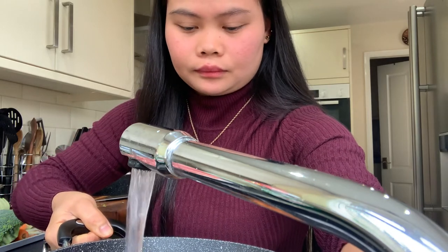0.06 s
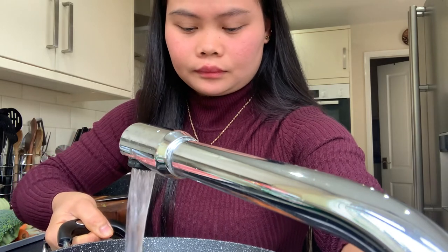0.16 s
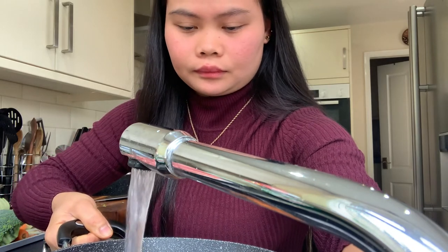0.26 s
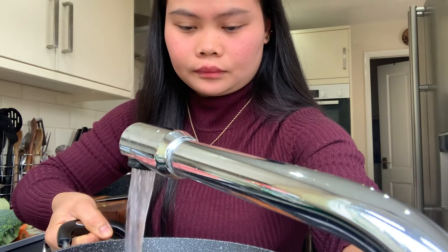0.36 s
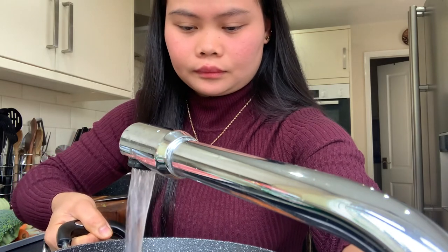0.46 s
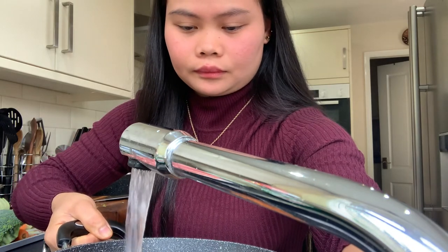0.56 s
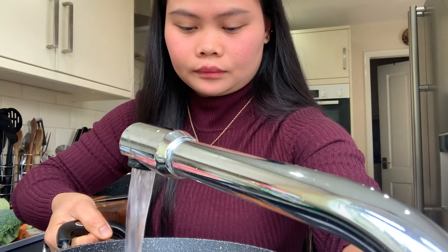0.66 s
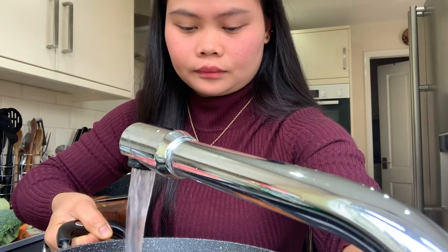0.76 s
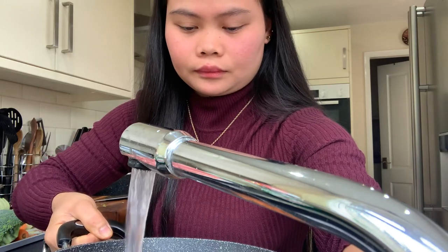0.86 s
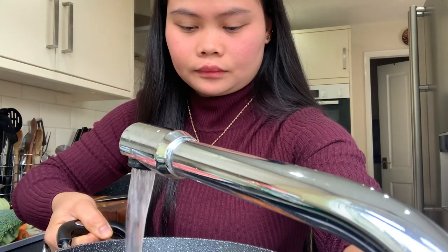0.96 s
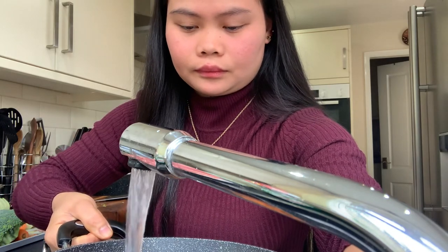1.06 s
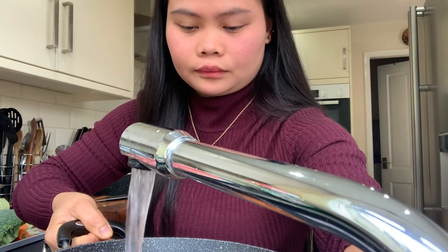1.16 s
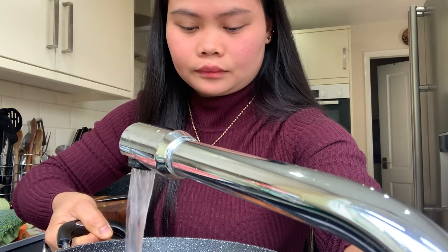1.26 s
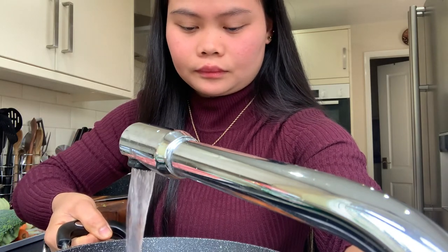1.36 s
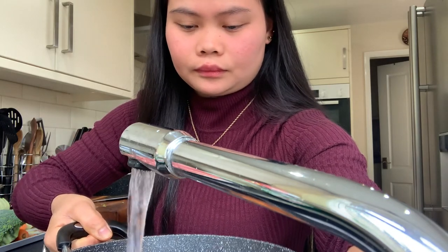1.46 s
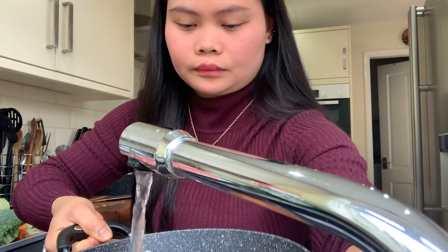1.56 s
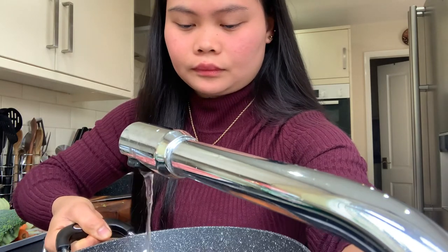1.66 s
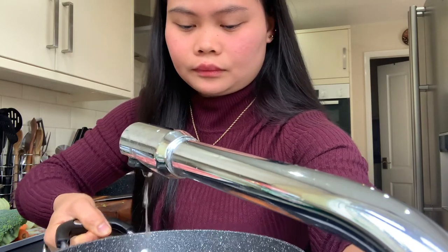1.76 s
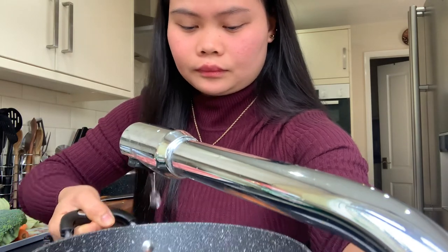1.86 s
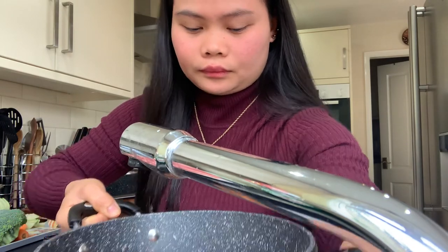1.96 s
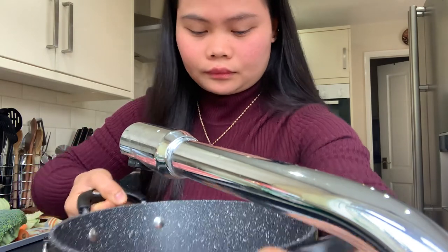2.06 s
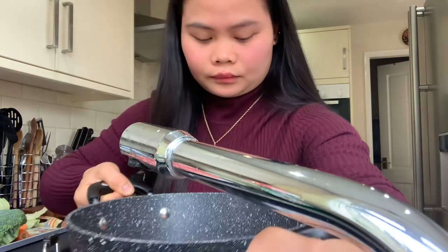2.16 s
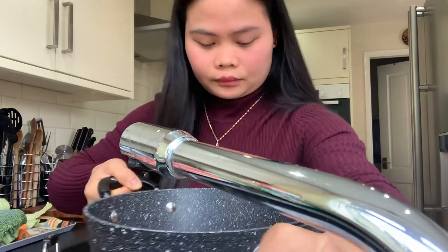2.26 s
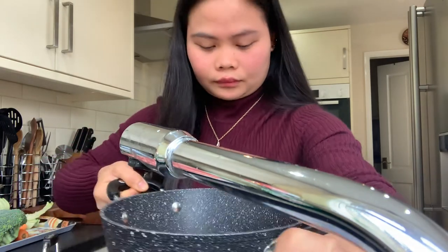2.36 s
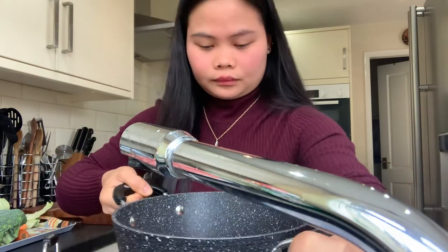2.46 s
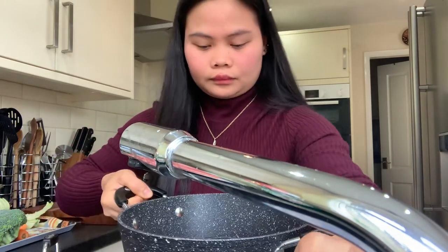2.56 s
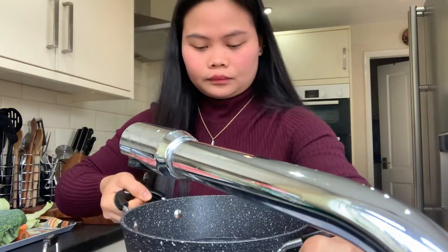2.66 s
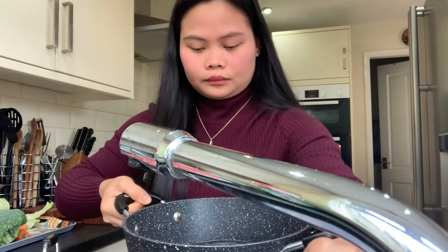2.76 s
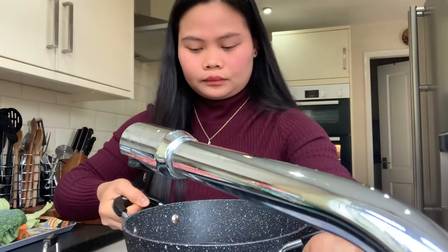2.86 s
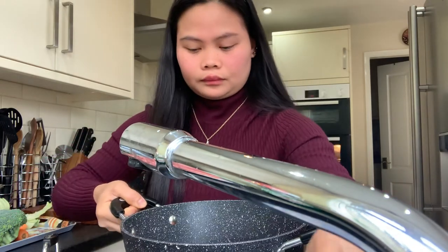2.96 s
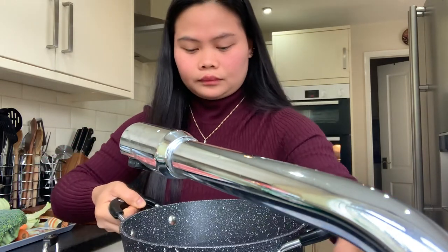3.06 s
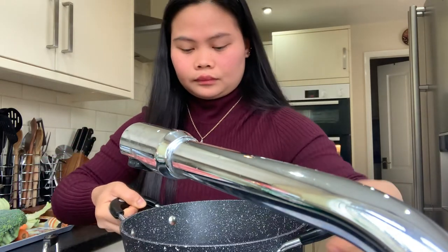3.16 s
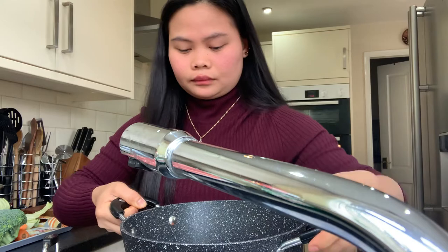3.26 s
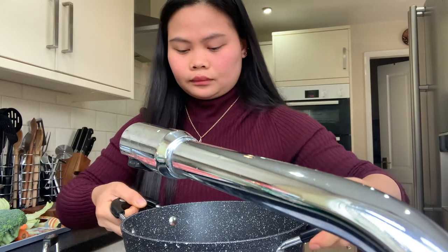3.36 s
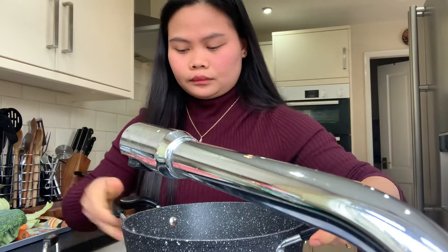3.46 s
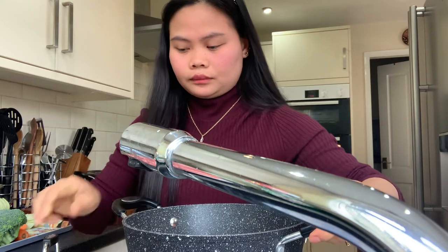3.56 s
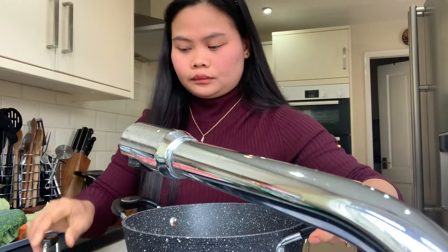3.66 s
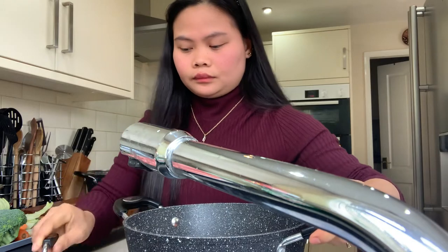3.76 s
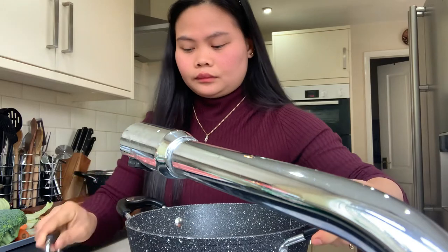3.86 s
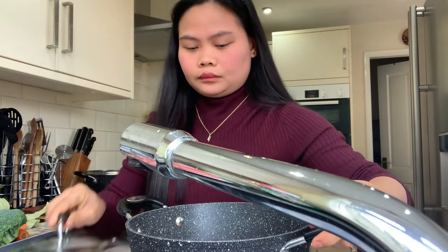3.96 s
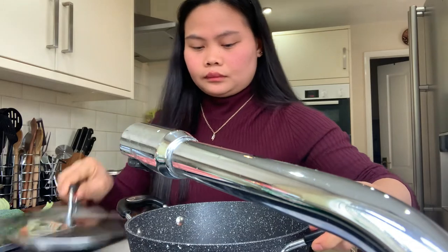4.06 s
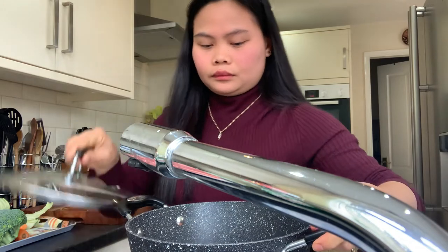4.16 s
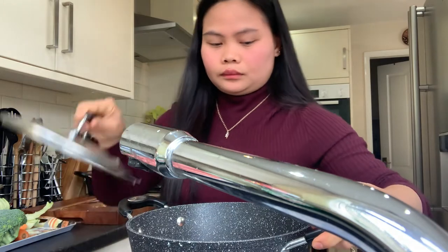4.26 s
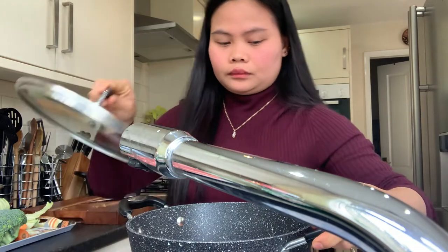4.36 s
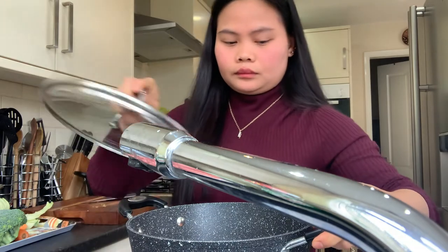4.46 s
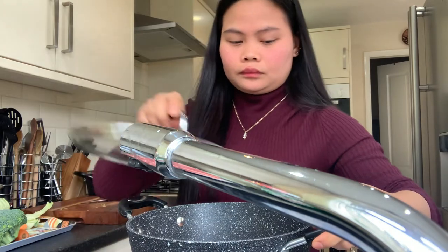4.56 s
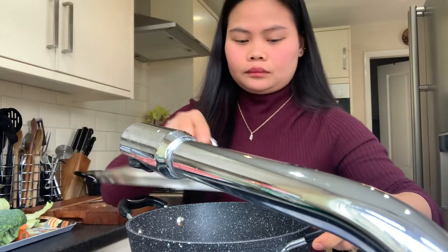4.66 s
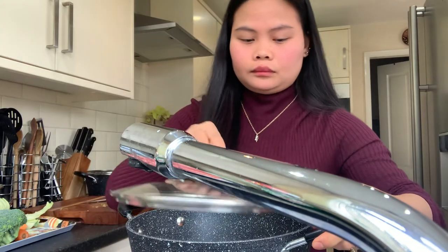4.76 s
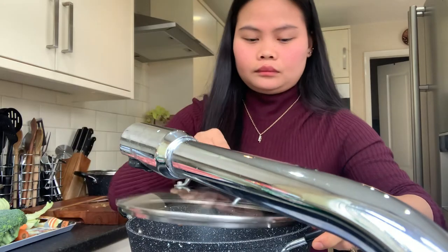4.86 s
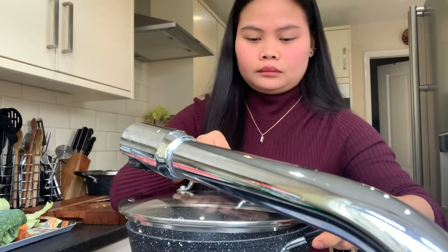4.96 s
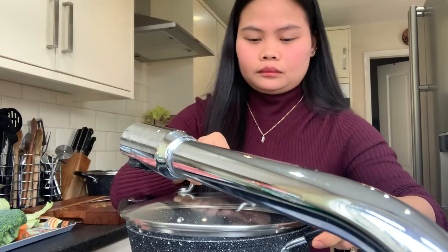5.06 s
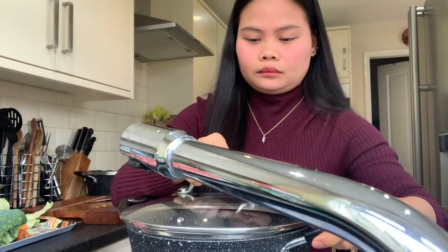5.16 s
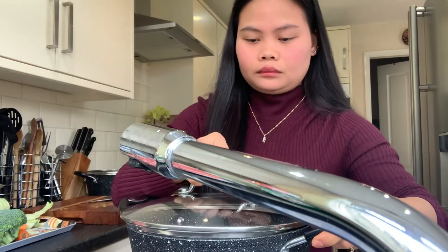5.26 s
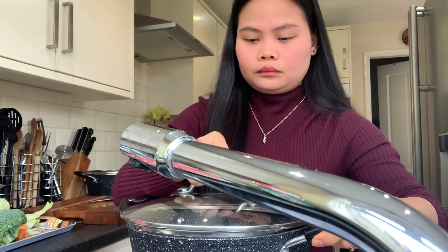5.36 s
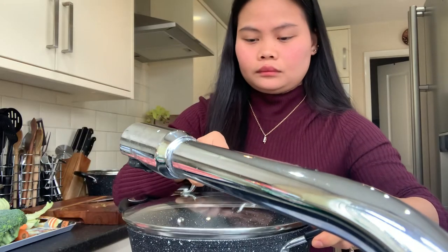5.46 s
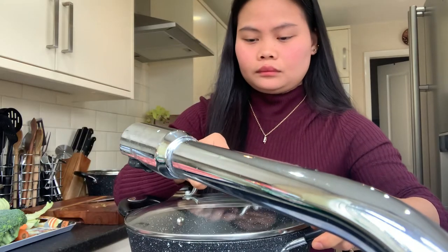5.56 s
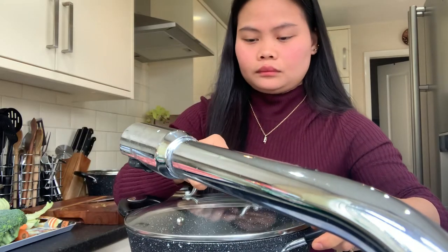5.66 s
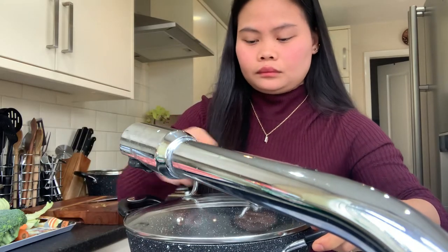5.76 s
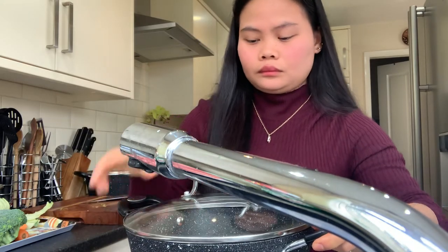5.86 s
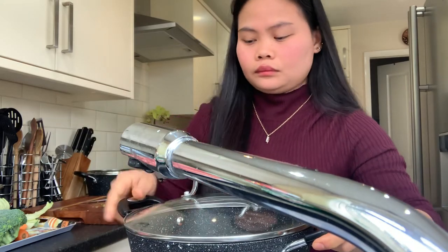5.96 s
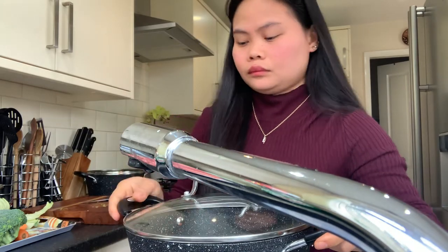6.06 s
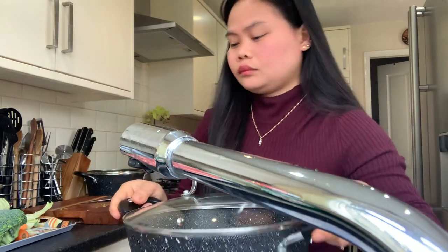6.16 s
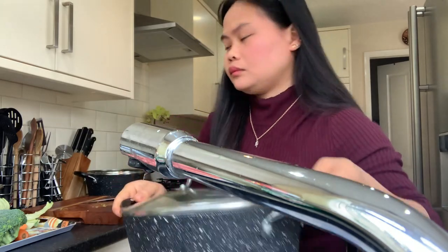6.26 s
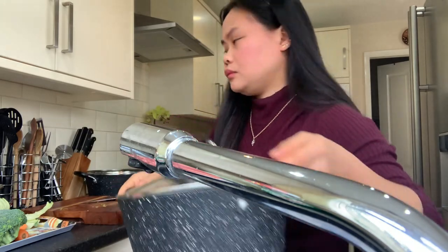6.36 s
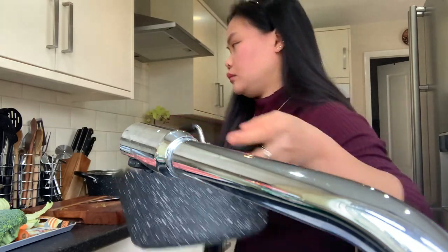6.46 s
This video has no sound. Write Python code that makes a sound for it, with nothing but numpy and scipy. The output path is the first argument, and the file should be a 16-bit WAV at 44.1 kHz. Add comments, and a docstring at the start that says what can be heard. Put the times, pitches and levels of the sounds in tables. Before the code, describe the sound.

A small, hard-surfaced kitchen heard in close stereo, with quiet low rumble and appliance hum throughout. From 0 to 1.5 s a tap runs strongly into a part-filled metal pot: dense splashing, fizzy spray, hollow gurgles and scattered deep plops, coloured by the pot. At about 1.5 s the flow collapses; a soft low rub of the lever, a dribble, plops and tiny bright droplets follow until 1.9 s, while foam crackle fades. A faint slosh comes at 2.1 s. The heavy pot thuds down at 2.8 s and again, duller, at 3.0 s. A light tick at 3.3 s and faint hand brushes precede a clattering lid clank at 3.9 s. The loudest, ringing clank comes at 4.15 s. The lid knocks the rim at 4.9 s, scrapes and rattles around 5.1 s, slides again at 5.4 s and seats with a firm clack at 5.6 s, then a faint low knock at 5.75 s; only hum remains.

```python
"""In a small hard kitchen, over a low hum, a tap runs into a metal pot and is shut off; drops plop, foam fizzes out.
The pot is set on the worktop; its steel-rimmed glass lid is tipped and lifted with clanks, slid and seated.
Water is a crowd of decaying bubble tones and noise grains, coloured by the resonances of the pot.
Each impact sums a click, a noise burst of dense modes and ringing tones; rubbing is random slips through
broad resonances. Two close microphone ports share every frequency between their mid and side."""
import sys
import numpy as np
from scipy import signal
from scipy.fft import rfft, irfft, next_fast_len
from scipy.io import wavfile
from scipy.ndimage import uniform_filter1d

SR = 44100
rng = np.random.default_rng(int(sys.argv[2]) if len(sys.argv) > 2 else 0)


def master(y):
    """Save y as 16-bit WAV."""
    cut = np.clip(np.atleast_2d(y).T, -1, 1)
    pcm = np.round(cut * 32767)  # scale
    wavfile.write(sys.argv[1], SR, pcm.astype(np.int16))


N = 287527

# reverberation of the kitchen: (frequency [Hz], time to fall 60 dB [s])
ROOM_T60 = [(60, 0.91), (300, 0.2), (1000, 0.48), (3000, 0.45), (6000, 0.41), (13000, 0.062)]
BANDS = 35 * 2 ** np.arange(0, 9, 1 / 3)  # third-octave centres [Hz]
TIME = np.arange(N) / SR  # [s]
RING = TIME[:int(.8 * SR)]  # time axis of one impact or room tail [s]
FREQ = np.fft.rfftfreq(next_fast_len(N + SR), 1 / SR)  # [Hz]
CLOSE_S, FOAM_END_S = 1.52, 2.7  # the tap is closed; the last of the foam is gone


def undb(db):
    """Decibels to amplitude ratio; twice the decibels give the power ratio."""
    return 10 ** (np.asarray(db) / 20)


def unit(x):
    """Normalise to rms 1, so that a later gain sets the level."""
    return x / np.sqrt(np.mean(x ** 2))


def at(table, hz):
    """Interpolate (frequency [Hz], value) points on a logarithmic frequency axis."""
    f, value = np.transpose(table)
    return np.interp(np.log(np.maximum(hz, 1)), np.log(f), value)


def colour(x, gain):
    """Linear filtering: the spectrum is multiplied by a gain given on FREQ."""
    size = next_fast_len(N + SR)
    return irfft(rfft(x, size) * gain, size)[..., :N]


def below(hz):
    """Low-pass gain on FREQ: third-order Butterworth magnitude without phase shift."""
    return 1 / np.sqrt(1 + (FREQ / hz) ** 6)


def above(hz):
    """High-pass gain on FREQ, power-complementary to the low-pass."""
    return np.sqrt(1 - below(hz) ** 2)


def fade(t, t60):
    """Exponential decay of a damped oscillator, 60 dB down after t60 [s]."""
    return np.exp(-np.log(1000) * t / t60)


def dies(start_s, db_per_s):
    """Exponential decay with a delayed onset: gain 1 until start_s, then a steady fall in decibels."""
    return undb(-db_per_s * np.maximum(TIME - start_s, 0))


def add(out, s, sound):
    """Superposition: mix a sound in at time s [s]."""
    start = max(int(s * SR), 0)
    out[..., start:start + sound.shape[-1]] += sound[..., :N - start]


def band_noise():
    """Third-octave analysis of white noise, uncorrelated in two channels: bands x 2 x N."""
    edges = np.array([2 ** (-1 / 6), 2 ** (1 / 6)])
    noises = []
    for hz in BANDS:
        sos = signal.butter(2, hz * edges, "band", fs=SR, output="sos")
        noises.append(unit(signal.sosfilt(sos, rng.standard_normal((2, N)))))
    return np.array(noises, np.float32)


def burst(bank, envelopes, band_db):
    """Frequency-dependent decay: random band noise, one envelope a band, band_db its relative energy per Hz."""
    start = rng.integers(N - len(RING))
    bands = bank[:, :, start:start + len(RING)] * envelopes[:, None].astype(np.float32)
    energy = np.einsum("bct,bct->bc", bands, bands)
    gain = undb(band_db)[:, None] * np.sqrt(BANDS[:, None] / energy)
    return np.einsum("bc,bct->ct", gain.astype(np.float32), bands)


def kitchen(bank, x, wet_db):
    """Direct sound a quarter turn apart at the two ports, plus diffuse reverberation from tiles and cupboards."""
    tail = burst(bank, fade(RING, at(ROOM_T60, BANDS)[:, None]), 0 * BANDS) / np.sqrt(BANDS.sum())
    direct = np.array([x, colour(x, 1j)])
    wet = undb(wet_db) * signal.fftconvolve(x[None], tail, axes=1)[:, :N]
    return (direct + wet) / np.sqrt(1 + undb(2 * wet_db))


def background(air_db=-52, hum_db=0, waver=0.93):
    """Room rumble is shaped broadband noise; an appliance's hum is tones with slow random phase modulation."""
    # spectrum of the room rumble: (frequency [Hz], relative level per Hz [dB])
    air_spectrum = [(21, -52), (35, -13), (102, -16), (124, -13), (207, -13.5), (234, -17), (310, -10.5),
                    (734, -25.5), (876, -20.5), (946, -22.5), (6330, -61.5), (9270, -56), (15000, -63.5)]
    # hum lines: (frequency [Hz], level [dB])
    hum_lines = [(99.5, -52.5), (203, -58.5), (309, -63), (899.0, -69.5)]
    air = unit(colour(rng.standard_normal((2, N)), undb(at(air_spectrum, FREQ))))
    hum = 0
    for hz, db in hum_lines:
        drift = unit(colour(rng.standard_normal(N), 1 / (1 + (FREQ / 5) ** 2)))
        hum = hum + undb(db + hum_db) * unit(np.sin(2 * np.pi * hz * TIME + waver * drift))
    return undb(air_db) * air + hum / np.sqrt(2)


def bubble(hz, t60, rise):
    """Bubble resonance: a damped sine whose pitch climbs by the share rise as it nears the surface."""
    t = TIME[:int(t60 * SR)]
    return np.sin(2 * np.pi * hz * t * (1 + rise * t / t60 / 2)) * fade(t, t60)


def grains(scatter_db):
    """Impulsive noise: each random sample has its own, very unequal strength."""
    return rng.standard_normal(N) * undb(scatter_db * np.minimum(rng.exponential(size=N), 5))


def bubble_crowd(count, scatter_db, cycles):
    """Incoherent sum of many bubble resonances over four octaves; the small ones are more even in strength."""
    bubbles = np.zeros(N)
    for when, place, size in rng.random((count, 3)):
        hz = 330 * 16 ** place
        loudness = undb(-scatter_db * (1 - place / 2) * np.log(size * .99 + .01))
        add(bubbles, when * FOAM_END_S, hz * loudness * bubble(hz, cycles / hz, 0.11))
    return bubbles


def pot_colour():
    """Source-filter principle: the water's spectrum times the resonances of the part-filled pot."""
    # spectrum of the running water: (frequency [Hz], relative gain [dB])
    water_spectrum = [(45, -1), (110, -3), (230, -5), (350, -9), (600, -9), (1100, -8), (1600, -12),
                      (2400, -13.5), (4200, -14.5), (6400, -8), (7600, -20), (9500, -3), (12000, -8.5),
                      (15000, -8)]
    # resonances and dips of the part-filled pot: (frequency [Hz], width [Hz], lift [dB])
    cavity = [(240, 70, -3), (465, 50, 6), (630, 70, 6.5), (1090, 100, 1.5), (1235, 70, 6), (1400, 120, -5),
              (1720, 70, 5), (1900, 120, -2), (2400, 200, 5), (2980, 60, 5), (4300, 300, -3),
              (5450, 700, -2.5), (6420, 300, 3), (6980, 160, 6), (7850, 300, 7), (8520, 220, 6),
              (10500, 300, 4), (13400, 300, 4)]
    gain_db = at(water_spectrum, FREQ)
    for hz, width, db in cavity:
        gain_db = gain_db + db / (1 + (2 * (FREQ - hz) / width) ** 2)
    return undb(gain_db)


def stream(bank, spray_db=-5, fizz_scatter_db=4.0):
    """Bubble entrainment: the jet drives in bubbles of all sizes; foam fizzes, then crackles over lapping water."""
    running = TIME < FOAM_END_S
    bubbles = bubble_crowd(count=2400, scatter_db=4.0, cycles=25)
    spray = grains(fizz_scatter_db) * running
    # the jet wobbles, so that its spray comes in spurts: 4 dB rms, up to about 22 Hz
    surge = undb(4 * unit(colour(rng.standard_normal(N), below(22))))
    gain = pot_colour()
    splash = colour(unit(bubbles) + 2 * undb(spray_db) * unit(spray * surge), gain * below(5050))
    foam = colour(spray, gain * above(5600))
    crackle = colour(grains(7.5) * running, gain * above(2600) * below(7100))  # bursting foam is uneven
    lapping = colour(splash, below(1450))

    closing = dies(CLOSE_S, 116)  # falls [dB/s]
    jet = undb(-37) * closing
    dribble = undb(-53) * dies(1.8, 116)
    fizz = undb(-40) * dies(CLOSE_S + 0.03, 234)
    # half strength under the jet, rising towards 1.5 as the splash ends, all under a slow fall
    settling = undb(-55) * dies(CLOSE_S, 27.5) * (1.5 - closing)
    layers = [(splash, np.maximum(jet, dribble)), (foam, fizz), (crackle, settling), (lapping, settling)]
    water = sum(sound * level / sound[running].std() for sound, level in layers)
    return kitchen(bank, water, wet_db=0.0)


def bubbling(start_s, end_s, count, db, scatter_db, low_hz, octaves, cycles):
    """Random entrainment: single bubbles at uniformly random moments, of random pitch and strength."""
    out = np.zeros(N)
    for when, place, size in rng.random((count, 3)):
        hz = low_hz * 2 ** (octaves * place)
        gain = undb(db + scatter_db * (2 * size - 1.5))
        add(out, start_s + when * (end_s - start_s), gain * bubble(hz, cycles / hz, 0.079))
    return out


def gurgle(bank):
    """Big air pockets dragged down by the jet ring low, its spatter higher; the thin dribble traps a few more."""
    jet = bubbling(0, CLOSE_S, count=90, db=-31.5, scatter_db=3.0, low_hz=480, octaves=1.42, cycles=22)
    spatter = bubbling(0, CLOSE_S, count=45, db=-36, scatter_db=4, low_hz=1600, octaves=1.05, cycles=24)
    dribble = bubbling(1.66, 1.85, count=16, db=-42, scatter_db=3, low_hz=440, octaves=1.6, cycles=19)
    return kitchen(bank, jet + spatter + dribble, wet_db=-2)


def plops(bank, splat_db=-11, splat_s=0.076, splat_hz=3000, count=6, small_db=-8, small_cycles=20,
          small_hz=560, octaves=1.34, within_s=0.011, rise=0.12):
    """Drop impact: a noisy splat, then the resonance of one big trapped bubble and a few small ones."""
    # large drops and air pockets: (time [s], bubble pitch [Hz], level [dB], decay time to -60 dB [s])
    drops = [(.039, 1144, -28, 0.083), (.198, 670, -31, 0.071), (.29, 1160, -24.5, 0.025),
             (.395, 1180, -37, 0.051), (.575, 625, -29, 0.073), (.577, 460, -24.5, 0.083),
             (.673, 1054, -30, 0.073), (.788, 460, -31, 0.08), (1.461, 1050, -34, 0.05),
             (1.688, 2050, -39, 0.053), (1.692, 640, -31, 0.043), (1.735, 656, -29, 0.029),
             (1.776, 1178, -23, 0.052), (1.778, 800, -32, 0.015), (1.804, 1207, -36.5, 0.12),
             (1.852, 578, -27.5, 0.064)]
    tones, splats = np.zeros((2, N))
    for s, hz, db, ring_s in drops:
        add(tones, s, undb(db) * bubble(hz, ring_s, rise))
        for when, place in rng.random((count, 2)):
            pitch = small_hz * 2 ** (octaves * place)
            gain = undb(db + small_db) * np.sqrt(small_hz / pitch)
            add(tones, s + within_s * when, gain * bubble(pitch, small_cycles / pitch, rise))
        add(splats, s, undb(db + splat_db) * rng.standard_normal(len(RING)) * fade(RING, splat_s))
    return kitchen(bank, tones + colour(splats, 1 / (1 + (FREQ / splat_hz) ** 2)), wet_db=-9.5)


def slip(length, hz, width):
    """Stick-slip friction: irregular impulses drive one broad resonance, filtered twice; rms 1."""
    size = int(length * SR)
    slips = rng.standard_normal(size) * (rng.random(size) < .03)
    resonance = signal.iirpeak(hz, hz / width, fs=SR)
    sound = signal.lfilter(*resonance, signal.lfilter(*resonance, slips))
    return unit(sound * signal.windows.tukey(size, .25))


def rubs(bank):
    """Friction noise: brushes of the hand, a slosh of water and slides of the rim, all as random slips."""
    # the lid's rim slides on the pot: (time [s], length [s], level [dB])
    slides = [(5.071, 0.12, -34.5), (5.433, 0.061, -36.5)]
    # resonances that a slide rings: (frequency [Hz], filter width [Hz], level [dB])
    rim = [(292, 205, 0.5), (605, 250, -12.5), (1540, 46, -28), (2220, 180, -35), (2820, 2000, -27.5)]
    # the tap's lever is pushed shut, the water sloshes as the pot is lifted, a hand brushes the handle,
    # then drags the lid: (time [s], length [s], level [dB], centre [Hz], filter width [Hz])
    brushes = [(1.604, 0.23, -45, 62.3, 112), (2.069, 0.068, -61.5, 1190, 500),
               (3.375, 0.079, -69, 4150, 6000), (3.762, 0.27, -55.5, 810, 1610)]
    out = np.zeros(N)
    for s, length, db in slides:
        add(out, s, sum(undb(db + rim_db) * slip(length, hz, width) for hz, width, rim_db in rim))
    for s, length, db, hz, width in brushes:
        add(out, s, undb(db) * slip(length, hz, width))
    return kitchen(bank, out, wet_db=6.0)


def droplets(bank, cycles=110, tick_db=-7, tick_s=0.022):
    """Small-bubble resonance: a fine droplet ticks on the surface and leaves one tiny, bright bubble."""
    # droplets flung off as the stream breaks up: (time [s], bubble pitch [Hz], level [dB])
    fine_drops = [(1.667, 4860, -44), (1.669, 6440, -45), (1.741, 6340, -43), (1.769, 6150, -37),
                  (1.776, 4950, -41), (1.816, 4150, -41.5), (1.819, 6400, -43), (1.842, 6300, -41),
                  (1.852, 1890, -50), (1.932, 6630, -49)]
    out = np.zeros(N)
    for s, hz, db in fine_drops:
        add(out, s, undb(db) * bubble(hz, cycles / hz, 0.12))
        add(out, s, undb(db + tick_db) * rng.standard_normal(len(RING)) * fade(RING, tick_s))
    return kitchen(bank, colour(out, below(10000)), wet_db=-8)


def rebounds(knocks, count, shrink, loss_db, bass_step_db, treble_step_db):
    """Inelastic rebound: each knock is count contacts, every one weaker and retuned in bass and treble."""
    blows = []
    for s, db, bass_db, treble_db, spot_hz, gap in knocks:
        for k in range(count):
            bass = bass_db + k * bass_step_db
            treble = treble_db + k * treble_step_db
            blows.append((s, db - k * loss_db, bass, treble, spot_hz))
            s = s + gap * shrink ** k
    return blows


def wander(count, hz):
    """Multipath interference: slow random complex gain, one row a tone, as many reflections give it."""
    low_pass = signal.butter(2, hz, fs=SR, output="sos")
    walks = signal.sosfilt(low_pass, rng.standard_normal((2, count, 2 * len(RING))))
    return unit(walks[0, :, len(RING):]) + 1j * unit(walks[1, :, len(RING):])


def ringing(modes, ring_s, echo_db, lag_cycles, bright_db, spread_hz=28, linger_s=0.48, dull_hz=9500):
    """Modal decay: each mode has a share of unit energy, dies in the hand and lingers, wavering, in the room."""
    # modes that hand and rim hardly damp, so that they ring on: (frequency [Hz], decay time to -60 dB [s])
    free_modes = [(413, .3), (444, .26), (995, .42), (1605, .24), (1836, .18), (2088, .38), (2288, .2),
                  (2470, .38), (2530, .33), (2499, .35), (2606, .26), (3114, .4), (3408, .33), (4285, .3),
                  (5455, .19), (11190, .18), (12660, .18), (14250, .17)]
    hz, mode_db = np.transpose(modes)[:, :, None]
    mode_db = mode_db + bright_db * np.log2(hz / 1000)
    room_t60 = linger_s / (1 + (hz / dull_hz) ** 2)
    own_t60 = ring_s * (1000 / hz) ** 0.11
    for free_hz, free_s in free_modes:
        own_t60[hz == free_hz] = free_s
    envelope = fade(RING, own_t60) + undb(echo_db) * wander(len(hz), spread_hz) * fade(RING, room_t60)
    onset = 1 - np.exp(-RING * hz / lag_cycles)
    envelope = envelope * onset * (1 - (RING / RING[-1]) ** 2)  # reaches zero at the end of RING
    energy = np.sum(np.abs(envelope) ** 2, axis=1, keepdims=True) / 2
    share = undb(mode_db) / np.sqrt(energy * np.sum(undb(2 * mode_db)))
    return np.exp(2j * np.pi * hz * RING) * envelope * share


def clusters(hz, lift_db, width_hz=40, width_share=0.0023):
    """Modal density: a gain on FREQ, positive lift_db gathering dense modes around the main ones."""
    grid = FREQ[::32]
    width = width_hz + width_share * hz[:, None]
    near = np.exp(-((grid - hz[:, None]) / width) ** 2).max(axis=0)
    power = undb(2 * lift_db * near)
    return np.interp(FREQ, grid, np.sqrt(power / uniform_filter1d(power, size=201)))


def contact(f, bass_db, treble_db, spot_hz):
    """Contact spectrum in dB: heavy blows add bass, hard ones treble; the spot struck lifts modes near its pitch."""
    spot = 6.5 * np.exp(-(np.log2(f / spot_hz) / 0.049) ** 2)  # lift [dB], 1/e half width [octaves]
    return spot + bass_db / (1 + (f / 300) ** 2) + treble_db / (1 + (2000 / f) ** 2)


def strike(bank, blows, body, modes, crack_db, damp_s, room_db, ring_s, echo_db, lag_cycles, bright_db,
           cluster_db, click_db):
    """Modal impact: a contact click, a crack of dense modes, ringing tones and room tail; bass builds up later."""
    build = 1 - np.exp(-RING * BANDS[:, None] / lag_cycles)
    crack = fade(RING, damp_s * (1000 / BANDS[:, None]) ** 0.031)
    room = undb(room_db) * fade(RING, at(ROOM_T60, BANDS)[:, None])
    envelopes = build * np.hypot(crack, room)
    body_db = at(body, BANDS)
    body_db = crack_db + body_db - 10 * np.log10(np.sum(BANDS * undb(body_db) ** 2))
    hz = np.transpose(modes)[0]
    tones = ringing(modes, ring_s, echo_db, lag_cycles, bright_db)
    span = np.sqrt(.035 * SR / (1 + undb(2 * crack_db)))  # reference energy: 35 ms, shared by ring and crack
    rings, cracks = np.zeros((2, 2, N))
    for s, db, bass_db, treble_db, spot_hz in blows:
        # every mode reaches the two ports up to a quarter turn apart, the low ones less
        apart = rng.choice([-1, 1], len(hz)) * hz / (hz + 200) / 4
        turn = rng.random(len(hz)) + np.array([[0], [1]]) * apart
        mode_gain = undb(contact(hz, bass_db, treble_db, spot_hz))
        ring = ((mode_gain * np.exp(2j * np.pi * turn)) @ tones).imag
        add(rings, s, undb(db) * span * ring)
        click = rng.standard_normal(len(RING)) * fade(RING, .006)  # hard edges meet
        add(rings, s, undb(db + treble_db + click_db) * click)
        crack_bands_db = body_db + contact(BANDS, bass_db, treble_db, spot_hz)
        add(cracks, s, undb(db) * span * burst(bank, envelopes, crack_bands_db))
    return rings + colour(cracks, clusters(hz, cluster_db))


def pot_down(bank):
    """Mode excitation by position: the full pot lands on one side of its base, then drops, duller, on the other."""
    # landings: (time [s], level [dB], extra bass [dB], extra treble [dB], favoured pitch [Hz],
    # time to the first rebound [s], side that lands)
    landings = [(2.8203, -20.5, -2.5, -2.5, 1510, .012, "first"),
                (2.885, -36.5, -11, -4, 1510, 0.014, "first"),
                (3.009, -26.5, 2.5, -1, 613, 0.012, "second"), (3.062, -43, -8, -22, 713, 0.017, "second")]
    # modes of the pot: (frequency [Hz], landing on the first side [dB], on the second [dB])
    pot_modes = [(55, -6, -10), (97, -6, -8), (145, -12, -2), (208, 2, -5), (270, -11, -11), (335, -8, -9),
                 (445, -22, -3), (590, -15, -7), (696, -6, -6), (768, -12, -5), (885, -7, -13),
                 (1087, -7, -14), (1200, -24, -17), (1320, -10, -30), (1510, -12, -32), (1660, -15, -32),
                 (1731, -15, -32), (1950, -19, -26), (2120, -16, -23), (2700, -17, -34), (3360, -22, -24)]
    # colour of its dense, quickly damped modes: (frequency [Hz], relative level per Hz [dB])
    pot_body = [(45, -4), (75, -10.5), (130, 4.5), (220, -5), (400, -6), (650, -15.5), (1100, -12),
                (1600, -26), (2600, -23.5), (4000, -32.5), (6000, -36), (9000, -46), (14000, -66)]
    out = 0
    for column, side in enumerate(["first", "second"], 1):
        knocks = [row[:-1] for row in landings if row[-1] == side]
        blows = rebounds(knocks, count=2, shrink=1, loss_db=2.5, bass_step_db=-1, treble_step_db=-6.0)
        modes = [(row[0], row[column]) for row in pot_modes]
        out = out + strike(bank, blows, pot_body, modes, crack_db=-0.5, damp_s=0.089, room_db=-10.5,
                           ring_s=0.05, echo_db=-18.5, lag_cycles=0.35, bright_db=-0.5,
                           cluster_db=5.5, click_db=-21)
    return out


def fitting_ticks(bank):
    """Light impact: single contacts on the steel fittings ring a few high modes."""
    # ticks: (time [s], level [dB], extra bass [dB], extra treble [dB], favoured pitch [Hz])
    tick_blows = [(3.309, -44, 0, -18, 2326), (5.541, -52.5, 5, 4, 2288)]
    # modes of the fittings: (frequency [Hz], level [dB])
    tick_modes = [(2288, 0), (3150, -5), (4420, -14), (6280, -18)]
    # colour of their dense modes: (frequency [Hz], relative level per Hz [dB])
    tick_body = [(200, -9), (1200, -2), (2500, -15), (6000, -12), (14000, -23)]
    return strike(bank, tick_blows, tick_body, tick_modes, crack_db=1, damp_s=.04, room_db=-3.0,
                  ring_s=0.056, echo_db=-19.5, lag_cycles=1.0, bright_db=3.5, cluster_db=-7, click_db=1)


def lid_tipped(bank):
    """Modal impact with rebounds: the lid clanks as it is tipped on its edge."""
    # knocks: (time [s], level [dB], extra bass [dB], extra treble [dB], favoured pitch [Hz],
    # time to the first rebound [s])
    tip_knocks = [(3.871, -20.5, 0.5, -0.5, 2820, 0.0071), (3.908, -22.5, -10.5, -2, 680, .011),
                  (3.929, -24, -8.5, -11.5, 607, .008), (3.944, -30.5, -12.5, -10.5, 590, 0.0043)]
    # modes of the tipped lid: (frequency [Hz], level [dB])
    tipped_modes = [(240, -11), (421, -11), (467, -11), (563, 0), (600, -5), (642, -1), (700, -6),
                    (768, -13), (938, -9), (972, -8), (1032, -1), (1287, -9), (1676, -13), (1752, -11),
                    (1790, -16), (1908, -13), (1966, -13), (2289, -13), (2499, -13), (2606, -9),
                    (2666, -12), (2760, -14), (3312, -12), (3375, -12), (3408, -8), (3480, -13),
                    (3720, -18), (3830, -18), (3996, -12), (4285, -14), (4346, -15), (4975, -19),
                    (5455, -5), (5975, -23), (6331, -20), (7111, -25), (8247, -24), (11190, -27),
                    (12660, -31), (14250, -36)]
    # colour of its dense modes: (frequency [Hz], relative level per Hz [dB])
    tipped_body = [(45, -17), (90, -16), (180, -8.5), (350, -9), (650, -6.5), (1100, -8), (1500, -18),
                   (2500, -13.5), (4000, -20.5), (6000, -21.5), (9000, -26.5), (14000, -60)]
    blows = rebounds(tip_knocks, count=3, shrink=0.97, loss_db=2.0, bass_step_db=5.0, treble_step_db=-2.5)
    return strike(bank, blows, tipped_body, tipped_modes, crack_db=-2.0, damp_s=0.075, room_db=-12.0,
                  ring_s=0.15, echo_db=-18.5, lag_cycles=0.31, bright_db=-0.2, cluster_db=7, click_db=-26)


def lid_lifted(bank):
    """Modal impact with quickening rebounds: the lid clanks loudly as it is lifted clear."""
    # knock: (time [s], level [dB], extra bass [dB], extra treble [dB], favoured pitch [Hz],
    # time to the first rebound [s])
    lift_knocks = [(4.152, -13, 1, -2, 2330, .01)]
    # modes of the lid: (frequency [Hz], level [dB])
    lid_modes = [(245, -8), (312, -6), (413, -1), (455, -3), (507, -8), (585, -3), (696, -1), (770, -10),
                 (989, -11), (1061, -7), (1176, -2), (1230, -9), (1550, -14), (1818, -15), (1943, -3),
                 (2036, -17), (2287, -7), (2390, -12), (2470, -4), (2530, -4), (2647, -12), (2770, -12),
                 (3115, -7), (3483, -13), (3741, -8), (3819, -12), (4150, -15), (4230, -11), (4334, -11),
                 (4423, -11), (4946, -19), (5048, -20), (5360, -11), (5455, -15), (6158, -23), (7044, -18),
                 (7564, -25), (7704, -23), (8095, -22), (11190, -32), (12400, -30), (13170, -36),
                 (14380, -34)]
    # colour of its dense modes: (frequency [Hz], relative level per Hz [dB])
    lid_body = [(45, 6.5), (90, -6.5), (135, 10), (200, -11.5), (350, 1.5), (600, -11.5), (850, -9.5),
                (1150, 7), (1500, -9.5), (2500, 1.5), (4000, -3.5), (6000, -12), (9000, -15.5),
                (14000, -47)]
    blows = rebounds(lift_knocks, count=3, shrink=.8, loss_db=3.0, bass_step_db=6, treble_step_db=-3.5)
    return strike(bank, blows, lid_body, lid_modes, crack_db=2.5, damp_s=0.07, room_db=-15,
                  ring_s=0.15, echo_db=-8.5, lag_cycles=0.71, bright_db=1.2, cluster_db=8.0, click_db=-24)


def seating(bank):
    """Mode excitation by position: the lid lands near edge, far edge, then flat, each weighting the same modes."""
    # contacts: (time [s], level [dB], extra bass [dB], extra treble [dB], favoured pitch [Hz],
    # time to the first rebound [s], part that lands)
    contacts = [(4.8883, -20, -8.5, -1.5, 1049, .007, "near"), (4.908, -29, -0.5, -16, 441, .012, "near"),
                (5.12, -31, 10, 8.5, 207.9, .008, "far"), (5.134, -25, -18.5, -6.5, 1690, 0.0055, "far"),
                (5.149, -30.5, -17.5, -7, 637, .012, "far"), (5.174, -38, -7, -8, 1850, .012, "far"),
                (5.544, -36.5, 7.5, -32, 350, .012, "flat"), (5.603, -22, -5, -3.5, 1055, .007, "flat"),
                (5.624, -29.5, 4, -8, 560, .012, "flat"), (5.744, -47.5, 13.5, -7, 167, .012, "flat")]
    # modes of the lid on the pot: (frequency [Hz], struck on the near edge [dB], far edge [dB], flat [dB])
    seat_modes = [(165, -5, -7, -20), (195, -14, -9, -3), (270, -18, -6, -9), (351, -9, -10, -11),
                  (444, 0, -16, -13), (512, -4, -3, -6), (612, -10, -3, -9), (680, -13, -6, -15),
                  (763, -9, -3, -20), (872, -13, -13, -7), (995, -24, -5, -16), (1032, -6, -14, -9),
                  (1114, -15, -22, -8), (1205, -13, -16, -14), (1450, -16, -22, -22), (1523, -23, -18, -14),
                  (1605, -17, -7, -19), (1836, -29, -13, -28), (1960, -20, -26, -30), (2088, -35, -12, -30),
                  (2162, -20, -28, -27), (2228, -20, -19, -33), (2335, -32, -16, -26),
                  (2530, -32, -30, -22), (2767, -32, -32, -21), (3114, -30, -23, -26),
                  (3340, -33, -28, -29), (3492, -34, -23, -38), (3724, -38, -31, -26)]
    # colour of their dense modes: (frequency [Hz], relative level per Hz [dB])
    seat_body = [(45, 6.5), (90, -3), (150, -4), (230, 0), (380, -13), (650, -8), (1150, -10),
                 (1600, -22.5), (2500, -20), (4000, -25.5), (6000, -34), (9000, -41.5), (14000, -60)]
    out = 0
    for column, place in enumerate(["near", "far", "flat"], 1):
        knocks = [row[:-1] for row in contacts if row[-1] == place]
        blows = rebounds(knocks, count=2, shrink=1, loss_db=0.5, bass_step_db=-5, treble_step_db=-11.5)
        modes = [(row[0], row[column]) for row in seat_modes]
        out = out + strike(bank, blows, seat_body, modes, crack_db=-2.0, damp_s=0.13, room_db=-8.0,
                           ring_s=0.091, echo_db=-16.0, lag_cycles=0.3, bright_db=-0.7,
                           cluster_db=5.0, click_db=-25)
    return out


def scene():
    """Superposition of the sources: hum, water, rubbing, pot, ticks, then the lid tipped, lifted and seated."""
    bank = band_noise()
    water = stream(bank) + gurgle(bank) + plops(bank) + droplets(bank)
    lid = lid_tipped(bank) + lid_lifted(bank) + seating(bank)
    return background() + water + rubs(bank) + pot_down(bank) + fitting_ticks(bank) + lid


def record(dry):
    """Mid-side decomposition: the port pair shares each frequency between sum and difference; bass and top are cut."""
    # near 9 kHz the ports are in opposite phase: (frequency [Hz], side minus mid gain [dB])
    ports = [(50, -15.5), (130, -5.5), (250, -5.5), (500, 3), (1200, 1), (4000, -1), (6500, 1.5), (7800, 6),
             (8300, 35.5), (9900, 52.5), (10600, 4), (12000, 0.5), (13200, -60)]
    # balance of the ports: (frequency [Hz], left minus right gain [dB])
    balance = [(60, 2.2), (250, 2.5), (600, 0.5), (1100, 0), (2300, -0.8), (6000, 0)]
    low_cut_hz, top_hz = 46.4, 15800
    ratio = undb(at(ports, FREQ))
    norm = np.sqrt(2 / (1 + ratio ** 2))
    mid = colour((dry[0] + dry[1]) / 2, norm)
    side = colour((dry[0] - dry[1]) / 2, norm * ratio)
    sign = np.array([[1], [-1]])
    low_cut = 1 / np.sqrt(1 + (low_cut_hz / (FREQ + 1)) ** 8)
    pair = colour(mid + sign * side, low_cut * undb(sign * at(balance, FREQ) / 2))
    return signal.sosfilt(signal.ellip(10, .2, 80, top_hz, fs=SR, output="sos"), pair)


dry = scene()
out = record(dry)
master(out)
```